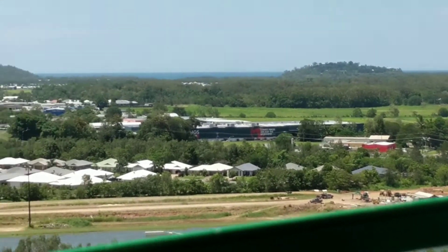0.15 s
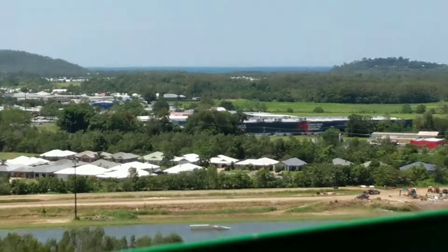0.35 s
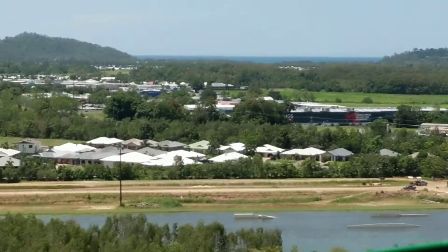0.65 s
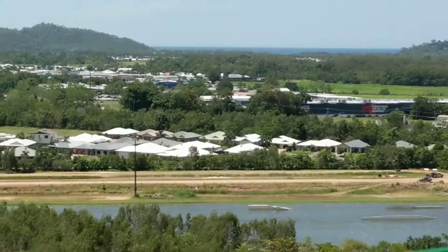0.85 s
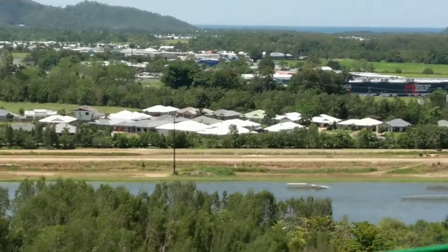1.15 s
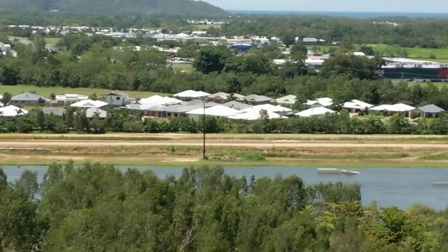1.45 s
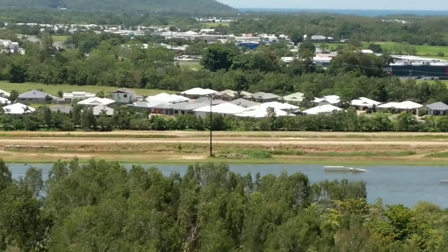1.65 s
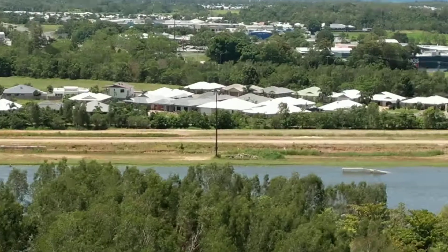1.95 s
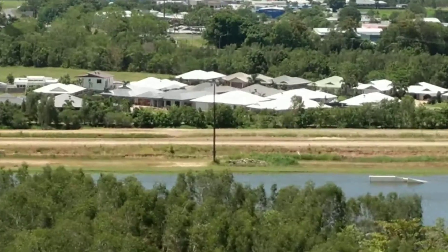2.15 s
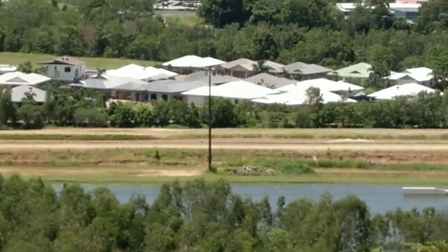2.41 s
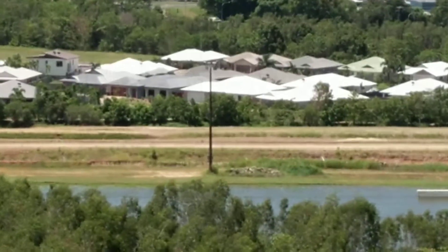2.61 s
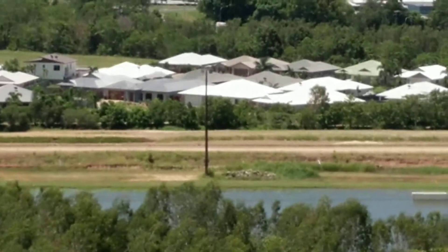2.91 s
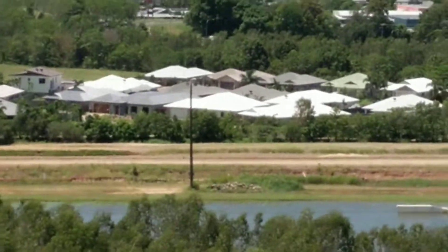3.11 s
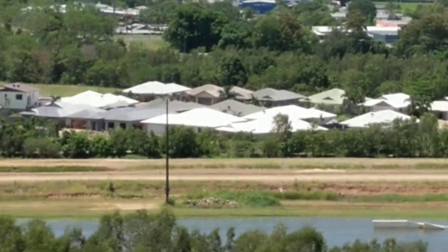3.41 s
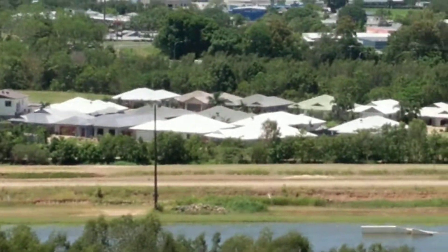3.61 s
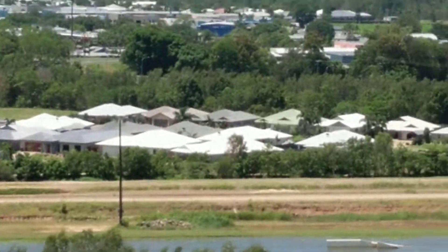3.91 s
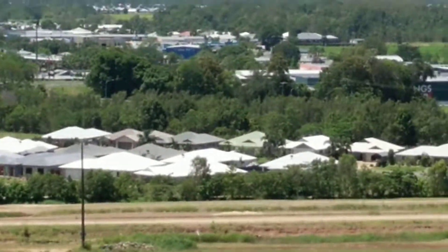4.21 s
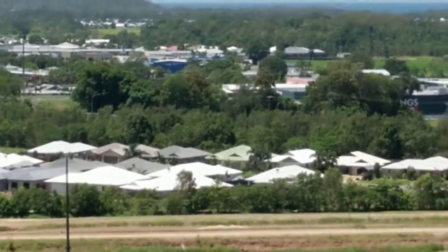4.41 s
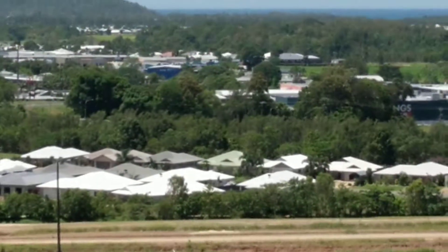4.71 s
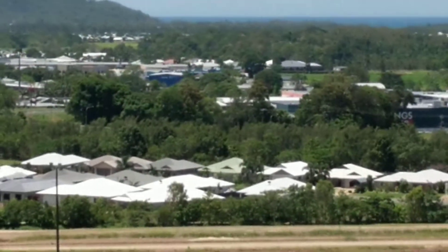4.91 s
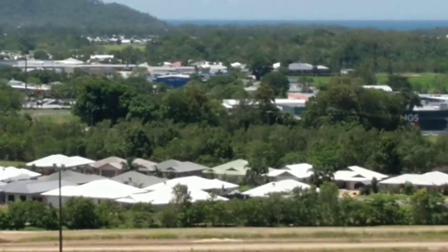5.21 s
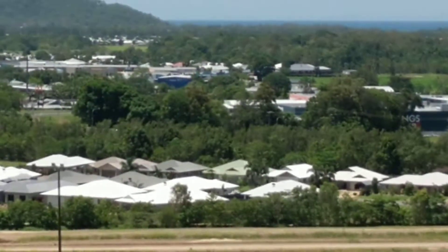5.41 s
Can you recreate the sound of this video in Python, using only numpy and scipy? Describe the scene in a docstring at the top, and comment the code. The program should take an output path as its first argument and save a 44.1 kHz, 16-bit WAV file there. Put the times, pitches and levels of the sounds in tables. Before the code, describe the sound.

A low, booming rumble fills a cable-car gondola for the whole five and a half seconds, heard from a seat inside, with a soft rush and hiss of air behind it. A loose metal fitting ticks lightly and unevenly all the way. A small panel click comes near 0.9 seconds and a hollower one with a dull thump at 1.5, as a faint hum rises, peaks around 2 seconds and fades.

From about 2.5 to 3.1 seconds the rumble swells and the loudest event arrives: a quick clatter of hard, bright metal clacks mixed with the door knocking and briefly ringing in its frame. Dull low thumps continue until about 4 seconds. Faint thin squeaks and dry rubbing follow between 4 and 4.5 seconds. A few light clicks fall around 4.5 to 4.8, and one more near 5.4, over the continuing rumble and ticking.

```python
"""Inside a cable-car gondola running along its rope. The rope shakes the cabin, which booms at a few low
resonances, and a loose metal fitting ticks all the way. Midway the shaking grows: the fitting clacks
hard and the door knocks in its frame, amid dull low thumps. Lone panel clicks, a passing hum, faint
squeaks and rubbing sit over the soft rush and hiss of air."""
import sys
import numpy as np
from scipy import signal
from scipy.fft import rfft, irfft
from scipy.io import wavfile
from scipy.ndimage import uniform_filter1d

SR = 44100
rng = np.random.default_rng(int(sys.argv[2]) if len(sys.argv) > 2 else 0)


def transcribe(u):
    """Save the signal u as a 16-bit wav file named by the first command-line argument.

    u: samples, shape (n,) or (channels, n), limited to [-1, 1]; the rate is SR.
    q: integer samples, one column per channel.
    """
    v = np.clip(np.atleast_2d(u).T, -1, 1)
    q = np.round(v * 32767).astype(np.int16)
    wavfile.write(sys.argv[1], SR, q)


N = 244755
TIME_S = np.arange(N) / SR
AGE_S = TIME_S[:SR // 2]  # time since a blow

# Modes of the metal fitting and the door panel. Each row: frequency in Hz, relative level in dB, t60 in s.
FITTING_MODES = [(2007, -1, 0.057), (2100, -13.5, 0.068), (2940, -32, 0.13), (3450, -19, 0.061),
                 (4620, -11, 0.039), (4980, -17, 0.076), (4850, -22, 0.057), (6840, -23, 0.083),
                 (7550, -27, 0.045)]
DOOR_MODES = [(351, -8, 0.39), (462.2, 4, 0.23), (567, 5.5, 0.12), (609, 6.5, 0.096), (690, -9.5, 0.24),
              (712, -6, 0.26), (751, -5, 0.14), (864, -11, 0.54), (957, -8, 0.37), (1138, -9.5, 0.33),
              (1262, -5.5, 0.26), (1258, -3, 0.12), (1315, -3.5, 0.14), (1623, -12.5, 0.36)]


def cabin_rumble():
    """Rope vibration fills the cabin with broad rumble, booming resonances and a deep heave."""
    # Rumble spectrum. Each row: frequency in Hz, relative gain in dB.
    spectrum = [(25, -32), (55, -3.5), (80, -5), (110, -5.5), (175, -5), (230, -6.5), (290, -12),
                (400, -20.5), (600, -32.5), (1200, -60)]
    # Cabin and wall resonances. Each row: frequency in Hz, width in Hz, relative level in dB.
    cabin_modes = [(78, 10.9, -2), (342.1, 12.5, -16.5)]
    wall_modes = [(136.74, 10.7, 0), (242.9, 4.96, -1)]
    # Course of the upper wall resonance. Each row: time in seconds, relative level in dB.
    upper_wall_levels = [(0, -52.5), (.87, -36), (1.1, -44), (2.05, -38), (2.6, -38.5), (3.55, -35.5),
                         (3.88, -50), (4.67, -36.5), (4.97, -47.5), (5.55, -47.5)]
    surge_db = rope_surge_db()
    broad = colour(rng.standard_normal(N), spectrum)
    booms = sum(undb(db) * even(resonance(hz, width_hz), 0.23) for hz, width_hz, db in cabin_modes)
    body = even(booms + undb(-2.5) * broad, 0.17) * undb(-35 + surge_db + 1.9 * walk(9))
    lower_wall_db = -40.5 + 0.53 * surge_db + 2.95 * walk(7)
    upper_wall_db = curve(upper_wall_levels) + 1.43 * walk(9)
    walls = sum(even(resonance(hz, width_hz), 0.17) * undb(db + level_db)
                for (hz, width_hz, db), level_db in zip(wall_modes, (lower_wall_db, upper_wall_db)))
    heave = even(resonance(hz=55.8, width_hz=9.6), 0.1) * undb(-48 + 2.65 * surge_db)
    return body + walls + heave


def rope_surge_db():
    """How much harder than usual the rope shakes the cabin."""
    # Each row: centre in seconds, half length in seconds, rise in dB.
    surges = [(2.295, 0.059, 2.5), (2.553, 0.1, 5.5), (2.781, 0.1, 7), (3.164, 0.36, 3.5), (3.985, 0.12, 2),
              (4.62, 0.15, 3.5)]
    return sum(db * swell(centre_s, half_s) for centre_s, half_s, db in surges)


def fitting_ticks():
    """The loose fitting taps its seat and chatters faintly in between."""
    # Tick spectrum. Each row: frequency in Hz, relative gain in dB.
    spectrum = [(300, -27), (1500, 3.5), (2100, 8), (2700, 0), (3600, 7), (4900, -6.5), (6000, -6.5),
                (8000, -3), (8900, -15), (16000, -24)]
    bounce_s, rise_s = 0.0375, 0.0008
    contacts, rings = np.zeros((2, N))
    echoes = rng.standard_normal(len(AGE_S))
    tap_rings = [ring(FITTING_MODES, scatter_db=1.4, detune=0.006) for _ in range(16)]
    press = build_up(rise_s)
    for k, (start_s, db) in enumerate(bounces(bounce_s) + chatter(bounce_s)):
        tap = contact(echoes, tail_t60_s=0.22, crack_t60_s=0.023, tail_db=-9.5, fresh=0.075)
        add(contacts, start_s, undb(db) * press * tap)
        add(rings, start_s, undb(db) * press * tap_rings[k % len(tap_rings)])
    return undb(-7) * colour(contacts, spectrum) + undb(-6.5) * rings


def bounces(period_s):
    """Firmer taps as (s, dB): once jogged, the fitting taps once or bounces at its own period."""
    # Each row: start in seconds, number of taps, relative level in dB.
    runs = [(0.1336, 1, -41.5), (0.3202, 3, -43.5), (0.469, 1, -37), (1.0241, 2, -43.5), (1.3378, 3, -41),
            (1.6776, 1, -43.5), (1.7392, 2, -41), (1.8397, 1, -36), (1.9884, 1, -37.5), (2.164, 1, -46),
            (2.3526, 2, -37.5), (2.4853, 1, -33.5), (2.932, 2, -34.5), (3.25, 3, -42), (3.3605, 1, -35),
            (3.4042, 3, -38), (3.6062, 2, -40.5), (3.7277, 1, -39.5), (3.8826, 3, -38.5), (3.9931, 1, -36),
            (4.0407, 2, -39), (4.2408, 3, -41.5), (4.3794, 2, -43), (4.6544, 1, -38), (4.7257, 2, -44),
            (4.882, 1, -36.5), (5.1048, 2, -41.5), (5.18, 1, -36), (5.3795, 1, -39.5)]
    scatter_db = 1.06
    return [(start_s + k * period_s, db + scatter_db * rng.standard_normal())
            for start_s, count, db in runs for k in range(round(count))]


def chatter(period_s):
    """Faint, uneven taps as (s, dB), louder when the cabin shakes."""
    gap_jitter, level_jitter = rng.standard_normal((170, 2)).T
    starts_s = np.cumsum(period_s * np.exp(0.22 * gap_jitter))
    levels_db = -49 + 0.7 * np.interp(starts_s, TIME_S, rope_surge_db()) + 3.5 * level_jitter
    return [(start_s, db) for start_s, db in zip(starts_s, levels_db) if start_s < TIME_S[-1]]


def fitting_clacks():
    """Shaken hard, the fitting grazes, then slams home with a bright snap and rings the door with it."""
    # Each row: start in seconds, relative level in dB, door ring trim in dB, echo t60 in seconds.
    clacks = [(2.5745, -23.5, -0.5, 0.22), (2.6132, -18, -4.5, 0.17), (2.7295, -24.5, -2, 0.14),
              (2.755, -24, -7, 0.31), (2.775, -17.5, -7.5, 0.22), (2.816, -18.5, -11, 0.22),
              (2.854, -19.5, -19, 0.13), (2.895, -24, -5.5, 0.19), (3.0515, -26, -5, 0.17),
              (3.092, -19.5, -4, 0.2)]
    # Clack spectrum. Each row: frequency in Hz, relative gain in dB.
    spectrum = [(200, -11.5), (700, 8), (1500, 2), (2100, 5), (3000, 3), (4500, 4), (5800, -4.5),
                (7900, 0.5), (8800, -9), (12500, -11.5), (16000, -25)]
    graze_lead_s = 0.0038
    contacts, snaps, rings = np.zeros((3, N))
    echoes = rng.standard_normal(len(AGE_S))
    for start_s, db, door_db, t60_s in clacks:
        add(snaps, start_s - graze_lead_s, undb(db - 7.5) * fade(0.015) * rng.standard_normal(len(AGE_S)))
        add(snaps, start_s, undb(db) * fade(0.01) * rng.standard_normal(len(AGE_S)))
        add(contacts, start_s, undb(db) * contact(echoes, t60_s, crack_t60_s=0.012, tail_db=-5, fresh=0.077))
        metal = undb(db - 14) * ring(FITTING_MODES, scatter_db=2.2, detune=0.0039)
        door = undb(db + door_db - 16) * ring(DOOR_MODES, scatter_db=1.1, detune=0.0038)
        add(rings, start_s, metal + door)
    snaps = colour(snaps, [(1000, -23), (3000, 6), (8000, 12), (9500, -1), (16000, -8)])
    return undb(-8) * colour(contacts, spectrum) + undb(-9.5) * snaps + rings


def door_knocks():
    """The door meets its seal: a soft onset and a strong ring from the panel."""
    # Each row: start in seconds, relative level in dB, door ring trim in dB, echo t60 and rise in seconds.
    knocks = [(2.511, -20.5, -6, 0.18, 0.0046), (2.538, -23.5, 2.5, 0.14, 0.0016),
              (2.675, -33, 7.5, 0.35, 0.0029), (2.7037, -24, 0, 0.17, 0.0012),
              (2.8066, -19.5, 0, 0.14, 0.0014), (3.128, -18.5, -6, 0.13, 0.0012)]
    # Knock spectrum. Each row: frequency in Hz, relative gain in dB.
    spectrum = [(200, 3), (600, 14), (1500, 5), (2100, 2.5), (4400, -1), (5800, -0.5), (7600, -1),
                (8800, -16), (12500, -21), (16000, -28)]
    contacts, rings = np.zeros((2, N))
    echoes = rng.standard_normal(len(AGE_S))
    for start_s, db, door_db, t60_s, rise_s in knocks:
        press = undb(db) * build_up(rise_s)
        add(contacts, start_s, press * contact(echoes, t60_s, crack_t60_s=0.025, tail_db=-2.6, fresh=0.2))
        add(rings, start_s, undb(door_db - 14.5) * press * ring(DOOR_MODES, scatter_db=1.2, detune=0.0026))
    return undb(-5) * colour(contacts, spectrum) + rings


def low_thumps():
    """Dull low thumps, and one longer boom of the lower wall resonance."""
    # Each row: start in seconds, relative level in dB, frequency in Hz, t60 in seconds.
    thumps = [(1.524, -26, 196, 0.2), (2.2509, -16.5, 221, 0.051), (2.613, -24.5, 192, 0.088),
              (2.808, -19, 174, 0.104), (3.0198, -8, 219, 0.024), (3.027, -15.5, 104, 0.093),
              (3.05, -15.5, 163, 0.083), (3.287, -17.5, 125, 0.063), (3.378, -21, 80, 0.21),
              (3.658, -20.5, 359, 0.048), (3.675, -13.5, 197, 0.025), (3.812, -24, 141.6, 0.67),
              (4.054, -23, 82.4, 0.44)]
    cutoff_hz = 480
    out = np.zeros(N)
    for start_s, db, hz, t60_s in thumps:
        add(out, start_s, undb(db) * fade(t60_s) * np.sin(2 * np.pi * hz * AGE_S))
    return signal.sosfiltfilt(signal.butter(3, cutoff_hz, fs=SR, output="sos"), out)


def panel_clicks():
    """Lone clicks of the cabin's panels, some thin and some hollow."""
    # Each row: start in seconds, relative level in dB, body gain in dB, echo t60 in seconds,
    # low-pass cutoff in Hz, rise in seconds.
    clicks = [(0.924, -36.5, -16, 0.17, 14000, .0015), (1.522, -32.5, 4, 0.18, 3640, 0.0025),
              (1.888, -37.5, -18, 0.048, 15000, 0.00077), (4.222, -42.5, -13, 0.26, 14000, 0.0029),
              (4.510, -37.5, 2, 0.059, 15000, 0.00077), (4.556, -37, 6, 0.079, 12000, 0.0012),
              (4.570, -36.5, -4, 0.14, 14000, 0.0022), (4.812, -42.5, 8, 0.22, 8000, 0.0013),
              (5.443, -33, -25, 0.19, 13000, 0.003)]
    # Spectra of the click and its hollow body. Each row: frequency in Hz, relative gain in dB.
    click_spectrum = [(300, 8), (1300, 5.5), (2000, 7), (3300, 4.5), (4300, 1), (6000, 0), (7900, 0.5),
                      (8800, -10.5), (16000, -14)]
    body_spectrum = [(100, -28), (300, -1.5), (650, 1.5), (1000, -8.5), (1600, -10), (3000, -30.5)]
    out = np.zeros(N)
    for start_s, db, body_db, t60_s, cutoff_hz, rise_s in clicks:
        echoes = rng.standard_normal(len(AGE_S))
        blow = contact(echoes, t60_s, crack_t60_s=0.02, tail_db=-0.54, fresh=0) * build_up(rise_s)
        click = colour(blow, click_spectrum) + undb(body_db) * colour(blow, body_spectrum)
        low_pass = signal.butter(4, cutoff_hz, fs=SR, output="sos")
        add(out, start_s, undb(db - 5) * signal.sosfilt(low_pass, click))
    return out


def air():
    """Wind rushes and hisses past the cabin; a rough hum comes and goes."""
    # Wind spectra. Each row: frequency in Hz, relative gain in dB.
    rush_spectrum = [(150, -7.5), (400, 1.5), (570, 1.5), (800, -2), (1100, -6), (1500, -13.5),
                     (3000, -33.5)]
    hiss_spectrum = [(300, -4), (1000, 0.5), (2000, 10), (3000, 1), (5000, -0.5), (7900, -3.5), (8700, -15),
                     (10400, -6), (12000, -34), (16000, -22)]
    # Level curves. Each row: time in seconds, relative level in dB.
    rush_levels = [(0, -52), (.7, -49.5), (1.4, -49.5), (2.3, -51.5), (3.3, -49.5), (4.0, -51.5),
                   (4.7, -51), (5.55, -52.5)]
    hum_levels = [(0, -77), (1.3, -59), (1.65, -50.5), (2.0, -46.5), (2.35, -52.5), (2.7, -51), (3.2, -75)]
    rush = colour(rng.standard_normal(N), rush_spectrum) * undb(curve(rush_levels) + 1.43 * walk(9))
    hiss_rise_db = np.minimum(0.94 * rope_surge_db(), 9)
    hiss = colour(rng.standard_normal(N), hiss_spectrum) * undb(-62.5 + hiss_rise_db + 0.5 * walk(27))
    hum = even(resonance(hz=676.5, width_hz=60), 0.11) * undb(curve(hum_levels) - 1.5)
    return rush + hiss + hum


def squeaks_and_rings():
    """Thin, unsteady squeaks, and two brief 2 kHz rings of the loose fitting."""
    # Each row: start and length in seconds, first and last pitch in Hz, peak level in dB.
    glides = [(-.04, .24, 2340, 2350, -57), (3.98, .04, 2005, 2000, -46), (4.022, .045, 2005, 2000, -49),
              (4.235, .04, 2850, 2780, -52), (4.285, .13, 3270, 2930, -57), (4.815, .04, 7500, 7400, -54)]
    out = np.zeros(N)
    for start_s, length_s, first_hz, last_hz, db in glides:
        count = int(length_s * SR)
        hz = np.linspace(first_hz, last_hz, count) * (1 + 0.023 * walk(600)[:count])
        add(out, start_s, undb(db) * np.hanning(count) * np.sin(2 * np.pi * np.cumsum(hz) / SR))
    return out


def panel_rub():
    """Dry panels slide on each other in many tiny slips."""
    # Each row: centre in seconds, half length in seconds, level in dB.
    spells = [(4.006, 0.14, -60), (4.382, 0.19, -61.5)]
    # Rub spectrum. Each row: frequency in Hz, relative gain in dB.
    spectrum = [(1200, -13), (2600, -1), (4100, 1), (5500, -13), (9000, -25)]
    slips = unit(rng.standard_normal(N) * undb(2 * walk(300)))
    envelope = sum(undb(db) * swell(centre_s, half_s) for centre_s, half_s, db in spells)
    return colour(slips, spectrum) * envelope


def ring(modes, scatter_db, detune):
    """Struck modes; each blow lands elsewhere and so weights them anew."""
    draws = rng.standard_normal((len(modes), 3))
    return sum(undb(db + scatter_db * weight) * fade(t60_s) * np.sign(polarity)
               * np.sin(2 * np.pi * hz * (1 + detune * shift) * AGE_S)
               for (hz, db, t60_s), (weight, shift, polarity) in zip(modes, draws))


def contact(echoes, tail_t60_s, crack_t60_s, tail_db, fresh):
    """A short crack and its dense cabin echoes; fresh is the share of power that is new noise."""
    grain = np.sqrt(1 - fresh) * echoes + np.sqrt(fresh) * rng.standard_normal(len(AGE_S))
    return grain * np.hypot(fade(crack_t60_s), undb(tail_db) * fade(tail_t60_s))


def resonance(hz, width_hz):
    """A resonance shaken at random, with steep skirts; rms 1."""
    b, a = signal.iirpeak(hz, hz / (1.5 * width_hz), fs=SR)
    drive = rng.standard_normal(N + SR)
    return unit(signal.lfilter(b, a, signal.lfilter(b, a, drive))[SR:])


def colour(x, spectrum, size=8192):
    """Causal filter through (Hz, dB) points that keeps the power of white noise."""
    hz, db = np.transpose(spectrum)
    bins_hz = np.arange(size // 2 + 1) * SR / size
    log_gain = np.log(undb(np.interp(np.log(bins_hz + 1), np.log(hz), db)))
    cepstrum = irfft(log_gain)[:size // 2]
    response = irfft(np.exp(rfft(2 * cepstrum, size)))
    return signal.fftconvolve(x, response / np.linalg.norm(response))[:len(x)]


def walk(rate_hz):
    """Random levels joined by ramps; rms 1."""
    hold = int(SR / rate_hz)
    return unit(uniform_filter1d(rng.standard_normal(N)[np.arange(N) // hold], hold))


def even(x, span_s):
    """Hold a noise near rms 1 over every span."""
    return x / np.sqrt(uniform_filter1d(x ** 2, int(span_s * SR)))


def build_up(rise_s):
    """A contact takes a moment to reach full force."""
    return 1 - np.exp(-AGE_S / rise_s)


def fade(t60_s):
    """Exponential decay by 60 dB in t60_s."""
    return np.exp(-np.log(1000) * AGE_S / t60_s)


def swell(centre_s, half_s):
    """Gaussian rise and fall, peak 1."""
    return np.exp(-((TIME_S - centre_s) / half_s) ** 2)


def curve(rows):
    """Interpolate (s, value) rows at every sample."""
    return np.interp(TIME_S, *np.transpose(rows))


def add(out, start_s, sound):
    """Mix a sound in, trimmed to the scene."""
    start = int(start_s * SR)
    sound, start = sound[max(-start, 0):], max(start, 0)
    out[start:start + len(sound)] += sound[:N - start]


def undb(db):
    """Decibels to gain."""
    return 10 ** (np.asarray(db) / 20)


def unit(x):
    """Scale to rms 1."""
    return x / np.sqrt(np.mean(x ** 2))


def scene():
    """Everything heard from a seat in the cabin, in mono."""
    rattle = fitting_ticks() + fitting_clacks() + door_knocks() + panel_clicks() + low_thumps()
    return (cabin_rumble() + air() + panel_rub() + squeaks_and_rings() + rattle)[None]


def record(dry):
    """Drop the deepest bass and cut the top steeply."""
    bottom_hz, top_hz = 28, 15550
    thin = signal.sosfilt(signal.butter(2, bottom_hz, "high", fs=SR, output="sos"), dry)
    return signal.sosfilt(signal.ellip(10, 0.2, 80, top_hz, fs=SR, output="sos"), thin)


dry = scene()
out = record(dry)
transcribe(out)
```